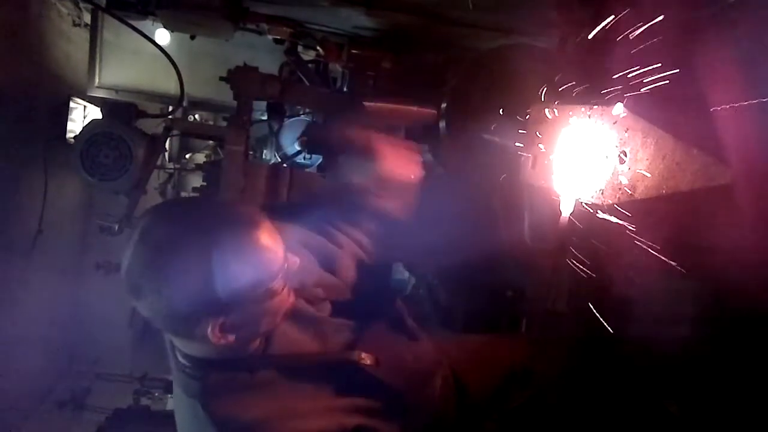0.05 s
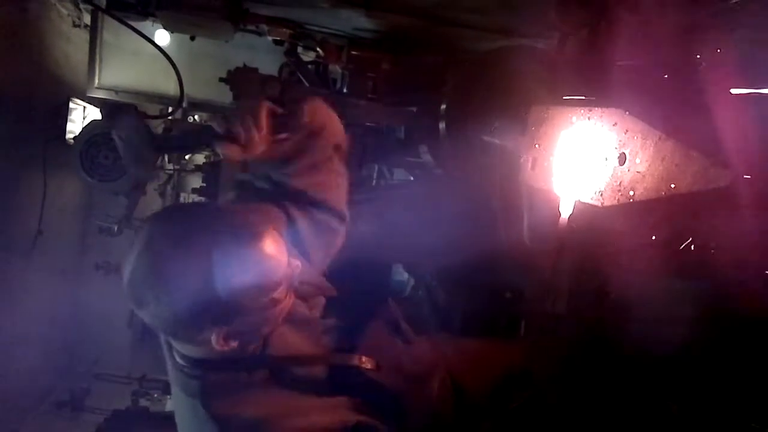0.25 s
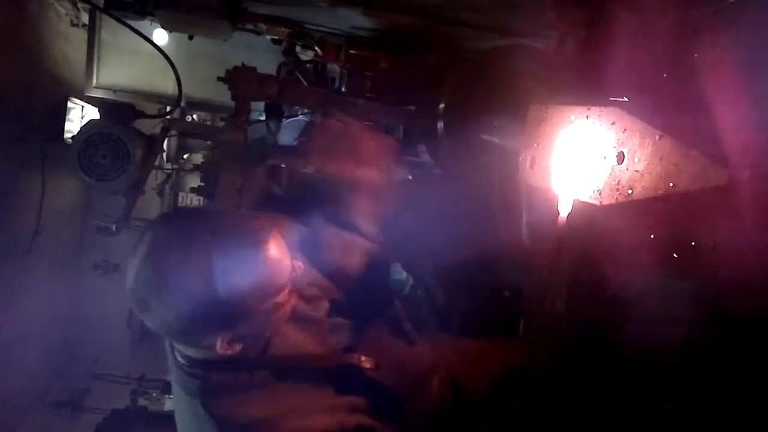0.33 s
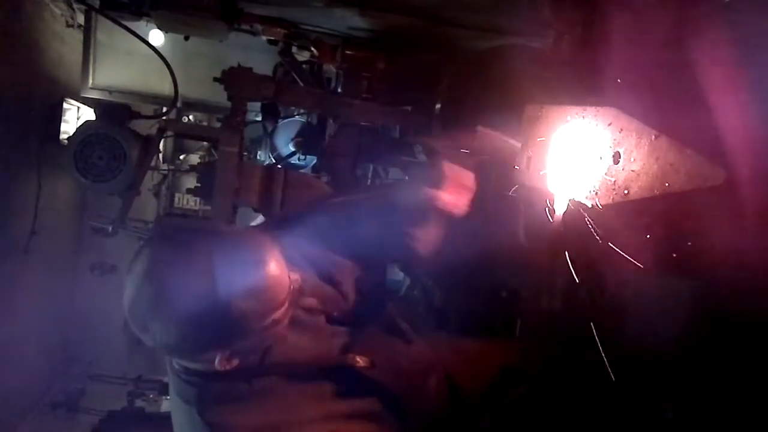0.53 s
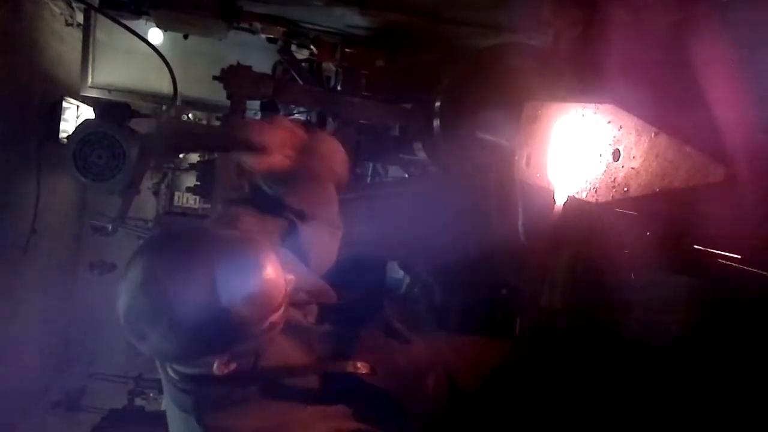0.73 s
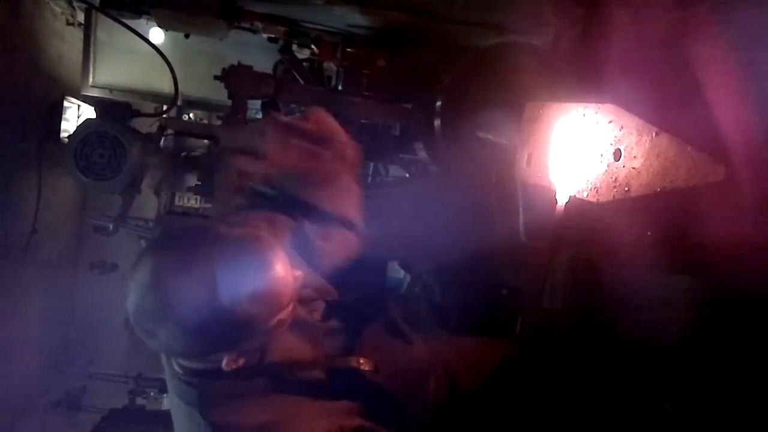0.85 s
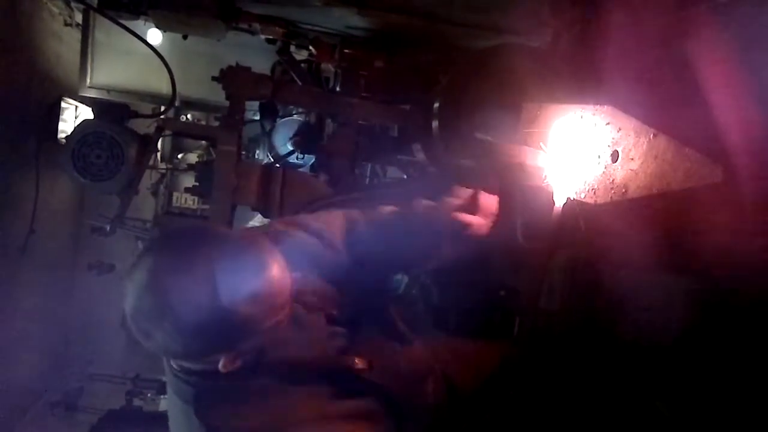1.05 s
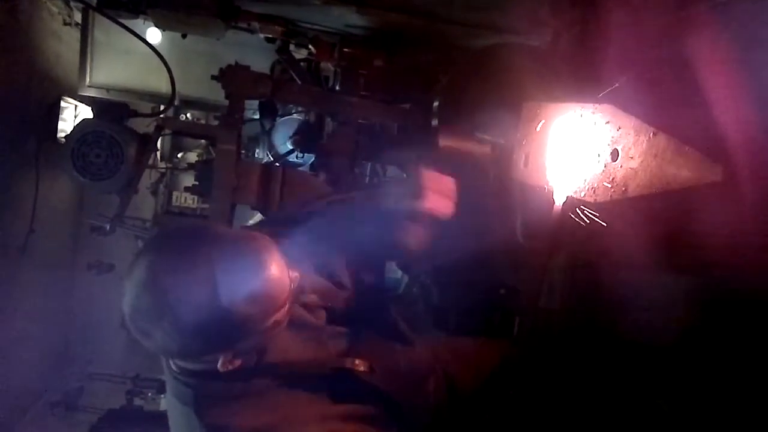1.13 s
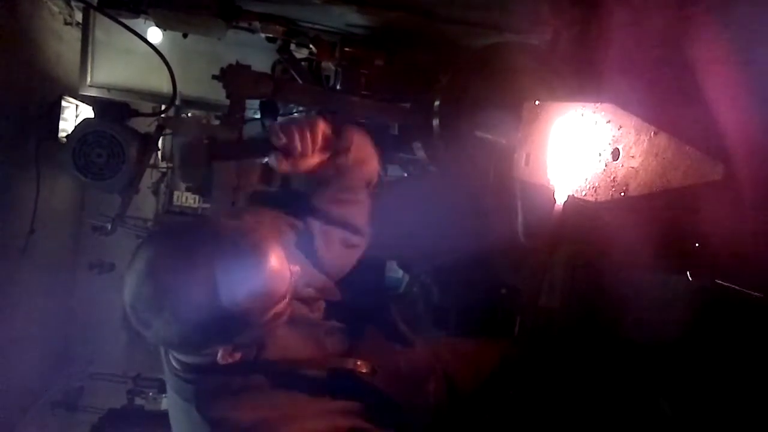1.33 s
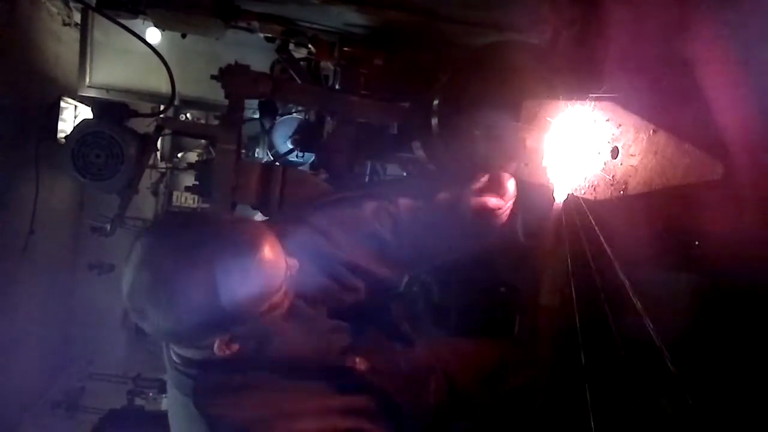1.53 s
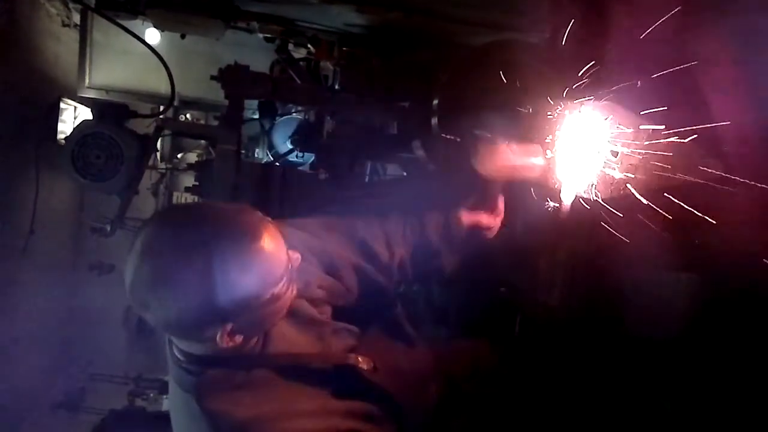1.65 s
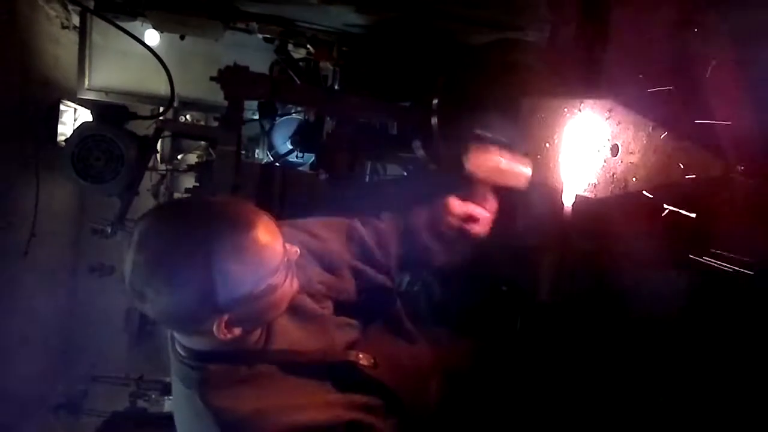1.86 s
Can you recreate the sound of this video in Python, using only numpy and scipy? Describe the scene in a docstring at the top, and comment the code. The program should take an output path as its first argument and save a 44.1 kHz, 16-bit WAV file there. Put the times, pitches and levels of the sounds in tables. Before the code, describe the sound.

Close by in a workshop, three evenly paced hammer blows clang on iron and an anvil, with faint spark sizzles between them. The hammer then taps the anvil twice and the steel rings on over a quiet blower hum.

```python
"""A smith's workshop, one microphone close to the anvil. A forge blower hums underneath throughout,
and at the start anvil and hammer still ring faintly. The smith strikes glowing iron three times:
each blow is a crack, a thud and a dense clatter that fills the room, over the ringing modes of
anvil, iron and hammer. Sparks sizzle between the blows. Last, the hammer bounces twice on the
bare face and the steel rings on."""
import sys
import numpy as np
from scipy import signal
from scipy.fft import rfft, irfft
from scipy.io import wavfile
from scipy.ndimage import uniform_filter1d

SR = 44100
rng = np.random.default_rng(int(sys.argv[2]) if len(sys.argv) > 2 else 0)


def pcm_store(signal):
    """Save signal as 16-bit PCM."""
    levels = np.round(np.clip(np.atleast_2d(signal), -1, 1) * 32767)
    wavfile.write(sys.argv[1], SR, levels.astype(np.int16).T)


N = 83790
T = np.arange(N) / SR
HZ = np.fft.rfftfreq(N, 1 / SR)

# colour of the air rushing through the forge: frequency_hz, density_db
AIR_SPECTRUM = [(20, -21), (33, -5.5), (48, -6.5), (68, 5), (100, 0.5), (125, -8), (200, -7), (260, -7),
                (330, 0.5), (430, -12.5), (650, -18.5), (1000, -17.5), (1350, -11.5), (2200, -19.5),
                (3200, -24.5), (4500, -35), (5800, -24.5), (9000, -25.5), (12000, -31), (15500, -32)]
# tones of the blower, before the swell: pitch_hz, level_db
BLOWER_TONES = [(99.5, -52), (149.6, -40.5), (343, -51), (498, -51.5)]
# slow swell of air and hum together: time_s, gain_db
FORGE_SWELL = [(0, 1), (.17, 3.5), (.55, -2.5), (.8, 0), (1.25, 0), (1.6, -1.5), (1.9, -3)]
# ring of the hammer head between contacts: start_s, level_db, t60_s
HAMMER_RINGS = [(0, -29.5, 1.07), (0.2407, -22, 2.07), (0.8084, -25.5, 1.07), (1.3344, -20, 0.45),
                (1.4892, -21.5, 0.43), (1.5819, -18.5, 0.36)]
# blows on the hot iron, each landing fully a short lag after first contact:
# start_s, clatter_db, clatter_tilt_db_per_octave, crack_db, thud_db, iron_db, spray_db, lag_s
BLOWS = [(0.2423, -11, -4.5, 0, -23.5, 4, -20.5, 0.00096), (.8072, -10, -3.5, -12, -22.5, 0, -19, 0.000793),
         (1.3347, -11.5, 2, -9, -32, 4, -11.5, .0042)]
# colour of the snap of contact: frequency_hz, density_db
CRACK_SPECTRUM = [(200, -31), (1600, 18), (3500, -43), (7000, -5), (11000, 1.5), (15500, -18)]
# colour of the anvil thudding into its stand: frequency_hz, density_db
THUD_SPECTRUM = [(30, -14), (70, -10), (150, -12.5), (290, -5.5), (400, -17), (800, -21), (3000, -70)]
# anvil modes, balanced by the spot that is struck:
# pitch_hz -> initial_t60_s, blow1_db, blow2_db, blow3_db, bounce1_db, bounce2_db
ANVIL_MODES = {1616: (0.7164, -10, -12, -10.5, -15.5, -19.5), 2012: (0.28, -14.5, -42, -20, -19, -18.5),
               2537: (0.4027, -15, -24.5, -19.5, -29, -22.5), 3068: (.35, -26, -22, -43, -31, -31.5),
               3160: (0.26, -27, -21, -24.5, -19.5, -38), 3895: (0.2646, -29.5, -42, -28, -26.5, -32),
               5235: (0.7367, -19.5, -17.5, -23, -18, -21), 5588: (0.46, -43, -45, -33, -29, -41),
               6502: (0.25, -20, -20.5, -21, -20, -44), 7091: (0.24, -16, -17.5, -27, -17.5, -48),
               7321: (0.39, -19.5, -34, -32, -33, -45), 7470: (.5, -37, -26.5, -32, -37, -39),
               7903: (0.6, -31, -32, -31, -39, -45), 8125: (0.5364, -20, -16, -22.5, -30.5, -38),
               8565: (0.26, -38, -38, -40, -28, -34), 8945: (0.42, -26, -40, -41.5, -58, -44),
               9523: (0.31, -42, -27, -30, -28.5, -60), 9889: (0.4, -44, -33, -38, -66, -57),
               10450: (0.38, -29, -35, -36, -33.5, -55), 10885: (0.34, -21.5, -25.5, -41, -60, -60),
               11020: (.45, -46, -52, -47, -37, -63), 11331: (0.96, -34.5, -30.5, -42, -32.5, -48),
               12410: (0.55, -31, -32, -41, -60, -60), 12740: (1.0, -60, -60, -58, -37, -60),
               13369: (0.84, -37, -33.5, -50, -43, -58), 14378: (0.5, -38, -40, -38, -51, -49),
               14557: (0.46, -42, -35, -30, -52, -60), 14822: (0.47, -30.5, -58, -31, -42, -58)}
# colour of a blow's clatter: frequency_hz, density_db
CLATTER_SPECTRUM = [(60, -15.5), (200, -6), (400, -9), (600, -3.5), (1000, -5), (1600, -1.5), (2200, -9),
                    (3300, -9.5), (4000, -15.5), (4800, -13.5), (5400, -10.5), (7800, -15.5), (9500, -24),
                    (12500, -34), (15500, -43)]
# reverberation of the workshop: frequency_hz, t60_s
ROOM_DECAY = [(100, 0.33), (400, 0.41), (1000, 0.4), (3000, 0.32), (6000, 0.34), (10000, 0.4), (16000, .2)]
# dull modes of the iron pinned under the hammer: pitch_hz, t60_s, relative_db
IRON_MODES = [(549, 0.19, -27), (687, 0.29, -33), (1036, 0.083, -13), (1226, 0.1, -17), (1585, 0.29, -13.5),
              (1716, 0.28, -18.5), (1951, 0.36, -26)]
# colour of scale spraying off the iron: frequency_hz, density_db
SPRAY_SPECTRUM = [(500, -16), (3000, -0.5), (4600, -15), (5400, 4), (8400, 4), (10500, -5), (13000, -11),
                  (15500, -20)]
# sparks: start_s, length_s, level_db
SPARKS = [(0.605, .085, -37.5), (1.283, 0.027, -40.5)]
# colour of their sizzle: frequency_hz, density_db
SIZZLE_SPECTRUM = [(1000, -38), (4500, -16), (6000, -0.5), (10000, 0), (15000, -1)]
# bounces on the bare face: start_s, clack_db, softness_db_per_octave
BOUNCES = [(1.4872, -17, 1.5), (1.5815, -21, 16)]
# colour of a bounce's clack: frequency_hz, density_db
CLACK_SPECTRUM = [(100, -9), (400, -15.5), (700, -12.5), (1400, -4), (2000, 1), (2600, -6.5), (3300, -9),
                  (4400, -12.5), (6800, -35), (9000, -34), (15500, -32)]


def amp(db):
    """Decibels to gain."""
    return 10 ** (np.asarray(db) / 20)


def unit_rms(x):
    """Scales to unit rms."""
    return x / np.sqrt(np.mean(abs(x) ** 2) + 1e-20)


def curve_at(points, hz):
    """Reads a table on a log-frequency axis."""
    table_hz, values = np.transpose(points)
    return np.interp(np.log(hz + 1), np.log(table_hz + 1), values)


def add(mix, start_s, sound):
    """Mixes a sound in from start_s on."""
    part = mix[max(round(start_s * SR), 0):][:len(sound)]
    part += sound[:len(part)]


def treble_octaves(hz, corner_hz=2570):
    """Octaves above the point where a soft contact starts to dull the sound."""
    return np.log2(np.maximum(hz / corner_hz, 1))


def noise(spectrum, tilt_db=0):
    """Unit noise of a given colour, its treble tilted by tilt_db per octave."""
    colour = amp(curve_at(spectrum, HZ) + tilt_db * treble_octaves(HZ))
    return unit_rms(irfft(rfft(rng.standard_normal(N)) * colour, N))


def wander(rate_hz):
    """A complex random drift that makes a tone waver in level and phase."""
    knots = rng.standard_normal((400, 2)) @ [1, 1j] / np.sqrt(2)
    return np.interp(T * rate_hz, np.arange(len(knots)), knots)


def forge(air_db=-39, patch_db=-0.5, hum_waver=0.35):
    """The blower drives rushing air, with faint drifting patches of colour, and a wavering hum."""
    bands = signal.stft(noise(AIR_SPECTRUM), SR, nperseg=1024)[2]
    patches = uniform_filter1d(rng.standard_normal(bands.shape), 10, axis=0)
    patches = unit_rms(uniform_filter1d(patches, 8, axis=1))
    air = signal.istft(bands * amp(patch_db * patches), SR, nperseg=1024)[1][:N]
    hum = np.zeros(N)
    for hz, db in BLOWER_TONES:
        tone = np.exp(2j * np.pi * (hz * T + rng.random()))
        hum += amp(db) * (tone * (1 + hum_waver * wander(rate_hz=6.95))).real
    swell_db = np.interp(T, *np.transpose(FORGE_SWELL))
    return (amp(air_db) * air + hum) * amp(swell_db)


def ring(hz, t60_s, db, waver=0.3, waver_fade_s=0.25, rise_s=0.0094):
    """One dying mode of struck metal; reflections make it waver while they are strong."""
    tone = np.exp(2j * np.pi * (hz * T + rng.random()))
    sway = 1 + waver * np.exp(-T / waver_fade_s) * wander(rate_hz=72.4)
    envelope = amp(db - 60 * T / t60_s) * (1 - np.exp(-T / rise_s))
    return envelope * (tone * sway).real


def hammer(pitch_hz=1830):
    """The hammer head sings on one mode after each rebound, until it next lands."""
    out = np.zeros(N)
    ends = [row[0] for row in HAMMER_RINGS[1:]] + [N / SR]
    for (start_s, db, t60_s), end_s in zip(HAMMER_RINGS, ends):
        add(out, start_s, ring(pitch_hz, t60_s, db, waver=0.097) * (T < end_s - start_s))
    return out


def blows(overtone_db=-30.5, second_crack_db=-11.5):
    """The hammer cracks the scale, flattens the iron and drives the anvil into its stand."""
    out = np.zeros(N)
    for spot, row in enumerate(BLOWS):
        start_s, clatter_db, tilt_db, crack_db, thud_db, iron_db, spray_db, lag_s = row
        add(out, start_s, amp(crack_db) * crack() + amp(thud_db) * thud() + anvil(spot))
        add(out, start_s, amp(overtone_db) * overtones())
        landing = amp(clatter_db) * clatter(CLATTER_SPECTRUM, tilt_db) + amp(second_crack_db) * crack()
        add(out, start_s + lag_s, landing + amp(iron_db) * iron() + amp(spray_db) * scale_spray())
    return out


def crack(soft_db=0, rise_s=0.00025, fall_s=0.0017):
    """The snap of contact, straight to the microphone; duller and weaker when the contact is soft."""
    envelope = np.minimum(T / rise_s, 1) * np.exp(-(T / fall_s) ** 2)
    return amp(-soft_db) * noise(CRACK_SPECTRUM, -soft_db) * envelope


def thud(peak_s=0.018, tail_s=0.04):
    """The stand takes the blow with a low burst of noise."""
    return noise(THUD_SPECTRUM) * np.minimum(T / peak_s, np.exp((peak_s - T) / tail_s))


def anvil(spot, late_fade_start_s=0.21, late_fade_db_per_s=122, reference_hz=1590):
    """The anvil's main modes, struck at one spot; the low tones fade faster late in the ring."""
    late_fade_db = np.maximum(T - late_fade_start_s, 0) * late_fade_db_per_s
    return sum(ring(hz, t60_s, levels_db[spot]) * amp(-late_fade_db * (reference_hz / hz) ** 2)
               for hz, (t60_s, *levels_db) in ANVIL_MODES.items())


def overtones(soft_db=0, count=44, low_hz=5370, high_hz=15060, t60_s=0.25, spread_db=12):
    """The anvil's many faint high modes: a shimmer drawn afresh at every strike."""
    t = T[:SR // 2]
    place, phase, strength = rng.random((3, count, 1))
    hz = low_hz + (high_hz - low_hz) * (np.arange(count)[:, None] + place) / count
    rolloff_db = 7 * np.log2(hz / low_hz) + soft_db * treble_octaves(hz)
    db = spread_db * (2 * strength - 1) - rolloff_db
    partials = amp(db) * np.sin(2 * np.pi * (hz * t + phase))
    return partials.sum(0) * amp(-60 * t / t60_s)


def clatter(spectrum, tilt_db=0, rise_s=0.00039, hold_s=0.02, fall_s=0.004, tail_db=3):
    """A burst of clatter that stays level for a moment, then dies away band by band."""
    hz, t, bands = signal.stft(noise(spectrum, tilt_db), SR, nperseg=256)
    held = np.exp(-np.maximum(t - hold_s, 0) / fall_s)
    tail = amp(tail_db - 60 * t / curve_at(ROOM_DECAY, hz)[:, None])
    envelope = np.hypot(held, tail) / np.hypot(1, amp(tail_db))
    burst = signal.istft(bands * envelope, SR, nperseg=256)[1][:N]
    return burst * (1 - np.exp(-(T / rise_s) ** 2))


def iron():
    """Pinned under the hammer, the hot iron rings dull and short."""
    return sum(ring(hz, t60_s, db) for hz, t60_s, db in IRON_MODES)


def scale_spray(peak_s=0.012):
    """Scale flies off the iron in a bright puff of hiss."""
    return noise(SPRAY_SPECTRUM) * T / peak_s * np.exp(1 - T / peak_s)


def sparks():
    """Sparks burn in short swells of fine sizzle."""
    out = np.zeros(N)
    for start_s, length_s, db in SPARKS:
        swell = np.sin(np.pi * np.minimum(T / length_s, 1))
        add(out, start_s, amp(db) * noise(SIZZLE_SPECTRUM) * swell)
    return out


def bounces(crack_db=-22, overtone_db=-36.5):
    """The hammer drops on the bare anvil and bounces, more softly the second time."""
    out = np.zeros(N)
    for spot, (start_s, clack_db, soft_db) in enumerate(BOUNCES, len(BLOWS)):
        clack = amp(clack_db) * clatter(CLACK_SPECTRUM, -soft_db)
        add(out, start_s, clack + amp(crack_db) * crack(soft_db) + anvil(spot))
        add(out, start_s, amp(overtone_db) * overtones(soft_db))
    return out


def scene():
    """The workshop as heard from beside the anvil, in mono."""
    lingering_anvil = ring(hz=5235, t60_s=0.58, db=-50)
    return (forge() + lingering_anvil + hammer() + blows() + sparks() + bounces())[None]


def record(dry, cutoff_hz=15800):
    """The microphone chain rounds off the loudest peaks, then cuts the highest treble."""
    rounded = dry / (1 + dry ** 6) ** (1 / 6)
    lowpass = signal.firwin(255, cutoff_hz, window=("kaiser", 8), fs=SR)
    return signal.oaconvolve(rounded, lowpass[None], "same")


dry = scene()
out = record(dry)
pcm_store(out)
```